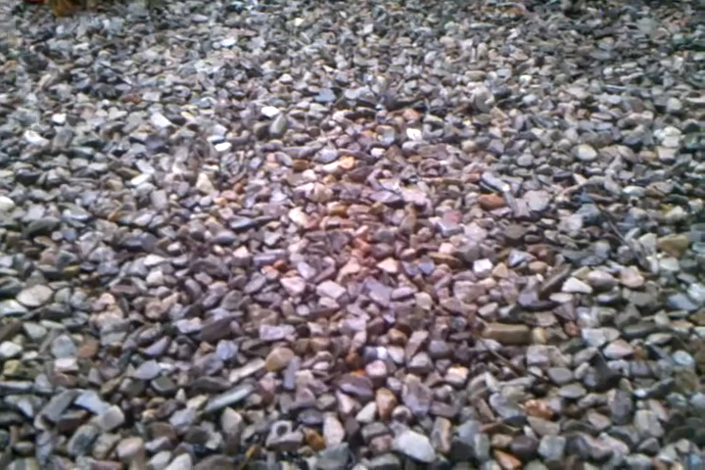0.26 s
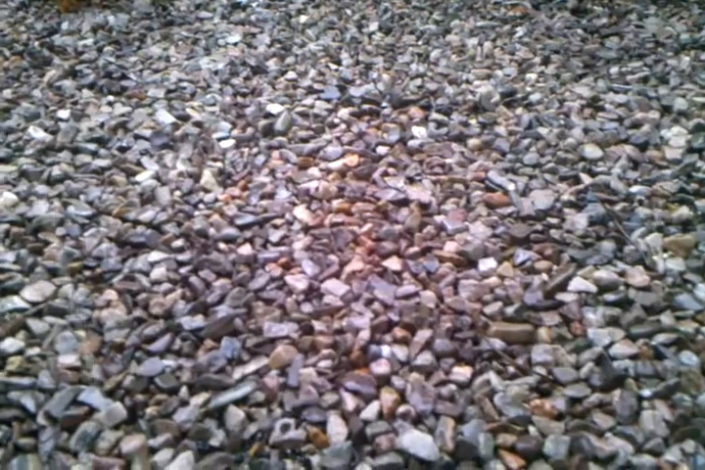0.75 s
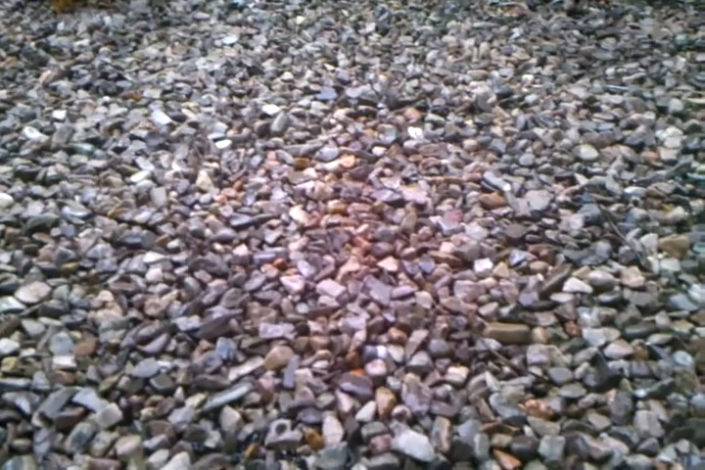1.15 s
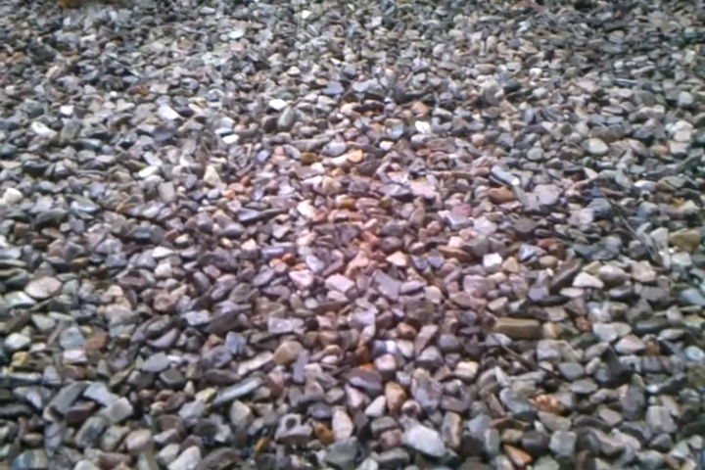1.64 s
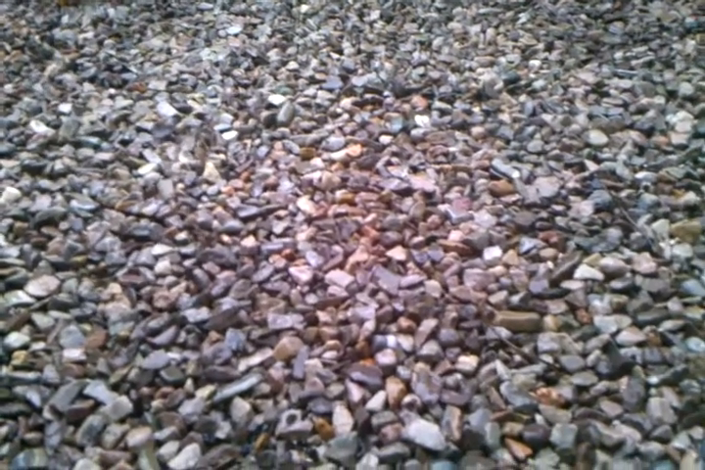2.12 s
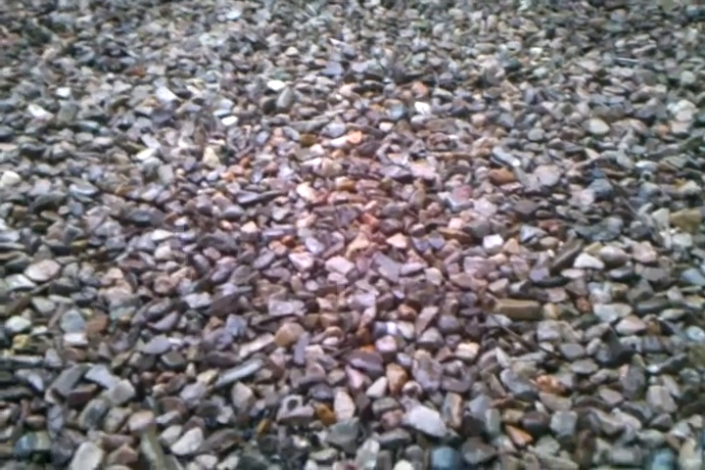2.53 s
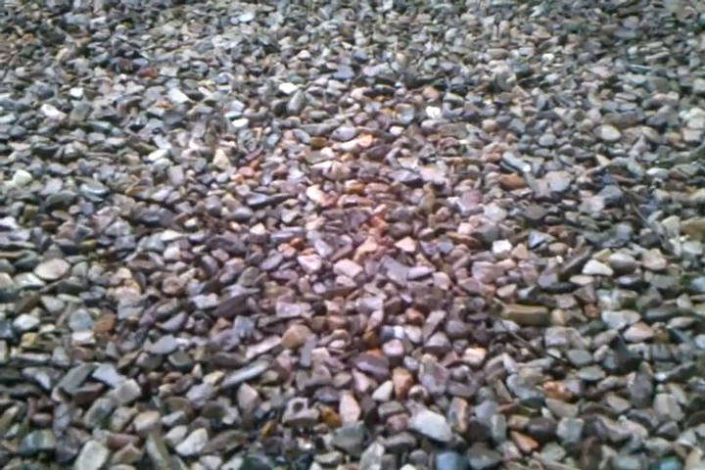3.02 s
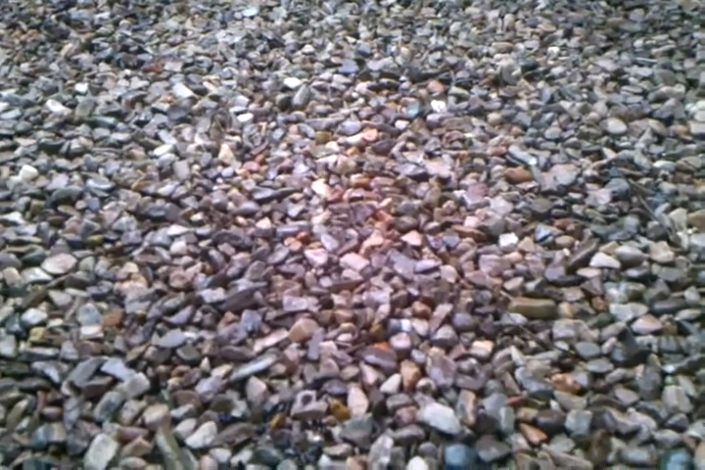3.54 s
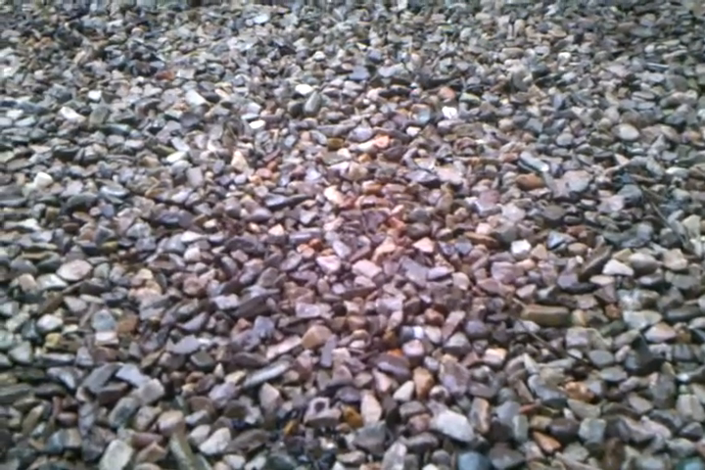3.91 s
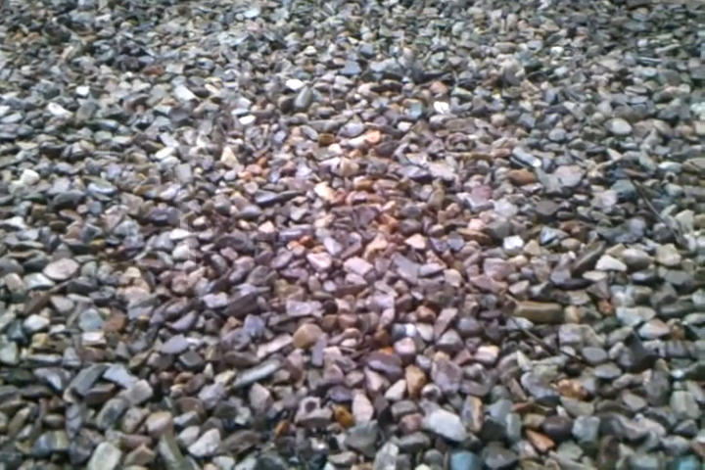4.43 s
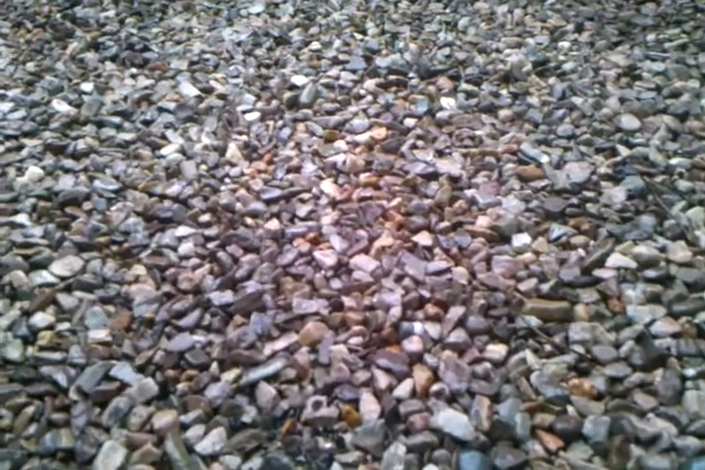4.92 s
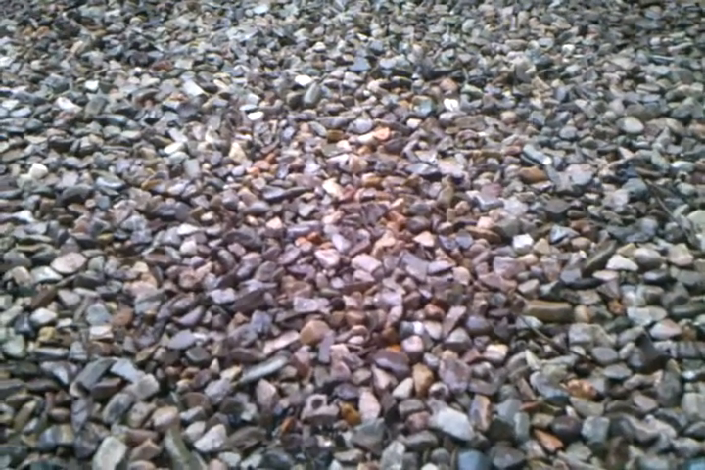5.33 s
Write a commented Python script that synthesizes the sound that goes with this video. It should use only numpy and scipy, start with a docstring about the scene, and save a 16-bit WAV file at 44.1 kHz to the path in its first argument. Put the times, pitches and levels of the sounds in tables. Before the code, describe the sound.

Torrential rain falls on loose gravel in the open air for about five and a half seconds, heard just above the stones. Throughout, a broad, low-to-mid wash of distant rain shifts in patches, faintly hollow, beneath dense crisp ticking on pebbles and softer plops in wet gaps. Fat drops burst into brief crackling sprays from the start, with longer splatters near 1.9 and 2.9 s and a cluster from 3.1 to 3.9 s; fainter ones scatter around. Drops strike beside the microphone at about 0.26, 0.7, 1.3, 2.9 (a bright, fizzing double hit), 3.5, 4.05, 4.9, 5.2 and 5.5 s, ranging from dull thuds to sharp cracks. Tiny short plinks occur near 0.3, 0.6, 4.0, 4.3 and 4.7 s. Rain strengthens slightly around 0.8 and 3.3 s and toward the end. The small microphone has little deep bass and clipped-off high treble.

```python
"""Torrential rain on loose gravel, heard from just above the stones for about five and a half seconds.
From the start a far wash (noise in shifting bands) lies under patter and plops (tiny blows that ring).
From the first moments fat drops burst into spray (clouds of random clicks), and fainter ones join all around.
From a quarter second in, drops hit right beside the microphone (filtered blows), and short tones plink.
The rain's strength swells and sinks; the last close hit comes just before the end."""
import sys
import numpy as np
from scipy import signal
from scipy.fft import rfft, irfft
from scipy.io import wavfile
from scipy.ndimage import uniform_filter1d

SR = 44100
rng = np.random.default_rng(int(sys.argv[2]) if len(sys.argv) > 2 else 0)


def wav_record(signal):
    """Record a signal, one row per channel, as 16-bit PCM in the file named by sys.argv[1]."""
    frames = np.transpose(np.atleast_2d(signal))
    bounded = np.clip(frames, -1, 1)
    # unit amplitude maps onto the largest positive 16-bit level
    quanta = np.round(bounded * 32767).astype(np.int16)
    wavfile.write(sys.argv[1], SR, quanta)


N = 245637  # length in samples


def gain_of(db):
    """Turns decibels into a factor."""
    return 10 ** (np.asarray(db) / 20)


def evened(x):
    """Scales a sound to an average (rms) level of 1."""
    return x / np.sqrt(np.mean(x ** 2) + 1e-20)


def read(points, hz):
    """Reads a filter curve between its points, with pitch on a logarithmic scale."""
    f, db = np.transpose(points)
    return np.interp(np.log(hz + 1), np.log(f), db)


def coloured(x, points):
    """Filters a sound by a curve of gains, then scales it to rms 1."""
    hz = np.fft.rfftfreq(len(x), 1 / SR)
    spectrum = rfft(x) * gain_of(read(points, hz))
    return evened(irfft(spectrum, len(x)))


def add(mix, s, sound):
    """Adds a sound to the mix, starting at s seconds."""
    part = mix[max(round(s * SR), 0):][:len(sound)]
    part += sound[:len(part)]


def play(table, source):
    """Makes one sound per row and places each at its time, the first column."""
    out = np.zeros(N)
    for s, *row in table:
        add(out, s, source(*row))
    return out


def ring(x, hz, width_hz):
    """A resonance: keeps the sound around one pitch, with gain 1 at that pitch."""
    return signal.lfilter(*signal.iirpeak(hz, hz / width_hz, fs=SR), x)


def cut(x, hz, kind):
    """A gentle low-pass or high-pass filter."""
    return signal.sosfilt(signal.butter(2, hz, kind, fs=SR, output="sos"), x)


def drops(n, per_s, spread_db):
    """Random impacts, pushing or pulling: many small, a few large."""
    size_db = spread_db * np.minimum(rng.exponential(1, n), 5)
    lands = rng.random(n) < per_s / SR
    return gain_of(size_db) * rng.choice([-1, 1], n) * lands


def hit(thud_db, thud_hz, crack_db, crack_hz, width_hz, fizz_db,
        fizz_decay=0.008, fizz_width_hz=2000, crack_lag=0.0001, bed_hz=125):
    """One blow gives a thud in the gravel bed, a crack on the stone and a brief fizz of spreading water."""
    t = np.arange(SR // 12) / SR
    blow = signal.unit_impulse(len(t))
    thud = cut(blow, thud_hz, "low")
    thud = cut(cut(thud, bed_hz, "high"), bed_hz, "high")

    late_blow = np.roll(blow, round(crack_lag * SR))
    crack = ring(ring(late_blow, crack_hz, width_hz), crack_hz, width_hz)

    water = rng.standard_normal(len(t))
    fizz = evened(ring(ring(water, crack_hz, fizz_width_hz), crack_hz, fizz_width_hz))
    fizz = fizz * np.exp(-t / fizz_decay)
    return gain_of(thud_db) * thud + gain_of(crack_db) * crack + gain_of(fizz_db) * fizz


# Drops right beside the microphone. Thud and crack levels apply to the blow, the fizz level before its fade:
# t/s, thud level/dB, thud upper limit f/Hz, crack level/dB, crack f/Hz,
# crack width f/Hz (of each of two resonances in a row), fizz level/dB
CLOSE_HITS = [ (0.2594, 6.5, 1210, -5, 3960, 4000, -51), (0.7237, 13.5, 850, 13.5, 2300, 746, -43),
              (1.3354, 9.5, 415, -26, 3000, 3000, -53), (2.8766, -10, 600, 11, 3870, 1720, -31),
              (2.9225, 4, 500, 20.5, 3510, 1900, -22.5), (3.4637, 12, 3040, 12.5, 5700, 1490, -58),
              (4.0458, 13.5, 2700, 11.5, 5830, 3980, -45), (4.8936, 8.5, 2240, 12, 5860, 3000, -31),
              (5.2187, 14.5, 620, -3, 3020, 4000, -38), (5.4767, 8, 1850, 8, 6440, 2200, -46)]


def close_hits():
    """The nearest drops, each a sharp blow on the gravel."""
    return play(CLOSE_HITS, hit)


def plink(db, hz, decay, rise=0.00041):
    """One damped tone: it starts softly and dies away quickly."""
    t = np.arange(SR // 8) / SR
    envelope = (1 - np.exp(-t / rise)) * np.exp(-t / decay)
    return gain_of(db) * np.sin(2 * np.pi * hz * t) * envelope


# Bubbles and loose pebbles that ring briefly:
# t/s, level/dB (before the rise and fade), f/Hz, decay t/s
RINGING_PEBBLES_AND_BUBBLES = [(0.259, -23, 1310, 0.0032), (0.570, -29, 721, 0.0083),
                               (0.580, -29, 914, 0.0091), (4.030, -15, 850, 0.0015),
                               (4.0458, -10.5, 1600, 0.00056), (4.321, -21.5, 3570, 0.0028),
                               (4.7085, -17.5, 2540, 0.0011)]


def plinks():
    """Bubbles and pebbles, each ringing at one pitch."""
    return play(RINGING_PEBBLES_AND_BUBBLES, plink)


def splash(db, length, hz, splat_db, rise=0.00031, width_hz=4200, splat_hz=800, splat_width_hz=900):
    """A drop shatters: a cloud of droplets rattles over the stones above a dull splat."""
    t = np.arange(SR // 4) / SR
    droplets = drops(len(t), per_s=6000, spread_db=2.8)
    spray = cut(ring(droplets, hz, width_hz), 1000, "high")
    spray = evened(cut(spray, 11000, "low"))
    splat = ring(rng.standard_normal(len(t)), splat_hz, splat_width_hz)
    splat = evened(cut(splat, 4500, "low"))
    envelope = (1 - np.exp(-t / rise)) * np.exp(-(t / length) ** 2)
    return gain_of(db) * envelope * (spray + gain_of(splat_db) * splat)


BURST_S, BURST_SPLAT_DB = 0.0072, -15.5  # the burst is short, with little splat
SPRAY_LAG_S = 0.009  # flight time of the droplets
# a longer spray carries more water and splats more
SPRAY_S, SPRAY_SPLAT_DB, SPLAT_DB_PER_DOUBLING = 0.075, -5.5, 2


def fat_drop(burst_db, spray_db, length, hz):
    """Two overlapping splashes: the burst on impact, then the thrown droplets landing."""
    out = splash(burst_db, BURST_S, hz, BURST_SPLAT_DB)
    splat_db = SPRAY_SPLAT_DB + SPLAT_DB_PER_DOUBLING * np.log2(length / SPRAY_S)
    add(out, SPRAY_LAG_S, splash(spray_db, length, hz, splat_db))
    return out


# Fat drops that burst, then come down again as spray. Levels are before the rise and fade:
# t/s, burst level/dB, spray level/dB, spray length t/s, centre of the rattle f/Hz
BURSTING_DROPS = [ (0.024, -38, -36, 0.047, 4930), (0.115, -32, -35, 0.019, 4000),
                  (0.243, -37, -32, 0.015, 4000), (0.781, -30.5, -32, 0.028, 4800),
                  (1.378, -38, -34.5, 0.015, 4470), (1.714, -36.5, -35, 0.018, 4600),
                  (1.803, -30, -32, 0.021, 5050), (1.926, -24, -36, 0.095, 5400),
                  (2.117, -26.5, -30, 0.012, 5900), (2.621, -44, -39, 0.095, 4200),
                  (2.924, -22.5, -41, 0.069, 6700), (3.124, -29, -29, 0.011, 3980),
                  (3.149, -29.5, -27.5, 0.02, 3800), (3.281, -29.5, -47, .01, 5000),
                  (3.355, -43, -34.5, 0.036, 4800), (3.439, -29, -44, .01, 5360),
                  (3.526, -41, -33, 0.054, 4600), (3.715, -30, -35, 0.012, 5000),
                  (3.909, -26.5, -46, .01, 4500), (4.969, -42, -35.5, 0.062, 4600),
                  (4.320, -32, -44, .012, 4500), (5.1615, -27, -30, 0.022, 4100)]


def splashes():
    """The nearer fat drops, bursting one by one."""
    return play(BURSTING_DROPS, fat_drop)


def farther_drops(burst_db=-37, spray_db=-40, spread_db=5, length=0.027, hz=4800, count=20):
    """Fainter fat drops all around, one at a random moment in each stretch of time."""
    out = np.zeros(N)
    for k, (when, near, size, stone) in enumerate(rng.random((count, 4))):
        near_db = spread_db * (near - 0.5)
        drop_length = length * 2 ** (2 * size - 1)  # half to double
        drop_hz = hz * 2 ** ((stone - 0.5) / 2)  # up to a quarter octave either way
        drop = fat_drop(burst_db + near_db, spray_db + near_db, drop_length, drop_hz)
        add(out, (k + when) / count * N / SR, drop)
    return out


def grains(low_hz, high_hz, cycles, per_s, spread_db, scatter, scatter_decay, count=40):
    """Drops on many spots; each spot rings at its own pitch as the drop lands and its droplets scatter."""
    t, out = np.arange(SR // 25) / SR, np.zeros(N)
    for hz in np.geomspace(low_hz, high_hz, count):
        droplets = rng.standard_normal(len(t)) * np.exp(-t / scatter_decay)
        blow = signal.unit_impulse(len(t)) + scatter * droplets / np.linalg.norm(droplets)
        one_drop = ring(blow, hz, hz / cycles)  # more cycles: a longer ring
        landings = drops(N, per_s / count, spread_db)
        out += signal.oaconvolve(landings, one_drop)[:N]
    return out


# Filter curve for the ticking of small drops on stone: f/Hz, level/dB
TICK_COLOUR = [(300, -16), (1000, -3), (2400, 0), (4000, 0), (5100, -3), (6600, 2)]
# Filter curve for drops plopping into the wet gaps between stones: f/Hz, level/dB
PLOP_COLOUR = [(130, -1), (300, -5.5), (560, -4), (950, 1), (1600, -11.5)]


def near_rain(strength_db, patter_db=-42.0, plops_db=-44, follow=0.41):
    """Ticks on the stones and plops between them, partly following the downpour in loudness."""
    patter = grains(1240, 6780, cycles=3.3, per_s=1800, spread_db=4.5, scatter=1.37, scatter_decay=0.0052)
    plops = grains(145.4, 1432, cycles=10.3, per_s=500, spread_db=1.5, scatter=0.45, scatter_decay=0.0079)
    patter = gain_of(patter_db) * coloured(patter, TICK_COLOUR)
    plops = gain_of(plops_db) * coloured(plops, PLOP_COLOUR)
    return (patter + plops) * gain_of(follow * strength_db)


# How hard the rain falls; only the ups and downs count, and depth shrinks them: t/s, level/dB
RAIN_COURSE = [(0.0, -41.5), (0.31, -40.5), (0.79, -38.5), (0.94, -40), (1.94, -40), (3.04, -41.5),
               (3.29, -38.5), (4.17, -40.5), (4.28, -41), (4.89, -40.5), (5.57, -39)]


def downpour_db(depth=0.7, surge_db=0.59, slow_hz=2.0, fast_hz=8.0, count=24):
    """The rain's strength around its average: a slow course with quick random surges."""
    t = np.arange(N) / SR
    s, db = np.transpose(RAIN_COURSE)
    course = np.interp(t, s, db)
    surges = np.zeros(N)
    for hz in np.geomspace(slow_hz, fast_hz, count):
        surges += np.sin(2 * np.pi * (hz * t + rng.random())) / np.sqrt(hz)
    return depth * (course - course.mean()) + surge_db * evened(surges)


# Filter curve for the far rain: f/Hz, level/dB
WASH_COLOUR = [(54, -38), (80, -8.5), (100, -7.5), (145, -1.5), (200, 0), (250, -2.5), (340, -1), (395, -6),
               (560, 0.5), (950, -3), (1450, -4), (2900, -7.5), (5000, -9.5), (6700, -11.5)]
# Hollow notes in the far wash: f/Hz, width f/Hz, level/dB (against the noise, before the filter curve)
HOLLOW_NOTES = [(445.6, 25, 3), (558, 120, -3.5), (905, 64, -19), (1810, 110, -6)]
WASH_DB = -35  # level at average strength


def wash(strength_db, patchy_db=1.5, follow=1.0):
    """Countless far drops: noise whose bands swell and sink in short patches, with a few hollow notes."""
    frames, hz = N // 256 + 5, np.fft.rfftfreq(1024, 1 / SR)
    real, imag, patches = rng.standard_normal((3, frames, len(hz)))
    patches = uniform_filter1d(patches, size=7, axis=0)  # smooth in time
    patches = evened(uniform_filter1d(patches, size=14, axis=1))  # and in pitch
    field = (real + 1j * imag) * gain_of(patchy_db * patches)
    noise = signal.istft(field.T, nperseg=1024, noverlap=768)[1][:N]
    notes = sum(gain_of(db) * ring(noise, note_hz, width) for note_hz, width, db in HOLLOW_NOTES)
    return coloured(noise + notes, WASH_COLOUR) * gain_of(WASH_DB + follow * strength_db)


def scene():
    """Closest hits, plinks, splashes, near patter and far wash, in the open air."""
    strength_db = downpour_db()
    foreground = close_hits() + plinks() + splashes()
    background = farther_drops() + near_rain(strength_db) + wash(strength_db)
    return (foreground + background)[None]


EDGE_HZ = 9250  # steep upper limit of the sound
# The microphone's treble roll-off: f/Hz, level/dB
TREBLE_ROLL_OFF = [(6700, -0.5), (6950, -4), (7250, -12.5), (7600, -23), (8000, -32.5), (8600, -33),
                   (9100, -44)]


def record(dry):
    """A small camera microphone: rounded peaks, no deep bass and a narrow band."""
    rounded = 0.75 * np.tanh(dry / 0.75)
    thin = signal.sosfilt(signal.butter(3, 68, "high", fs=SR, output="sos"), rounded)
    treble_db = read(TREBLE_ROLL_OFF, np.fft.rfftfreq(N, 1 / SR))
    dull = irfft(rfft(thin) * gain_of(treble_db), N)
    edge = signal.firwin(511, EDGE_HZ, window=("kaiser", 9), fs=SR)
    return signal.oaconvolve(dull, edge[None], "same")


dry = scene()
out = record(dry)
wav_record(out)
```